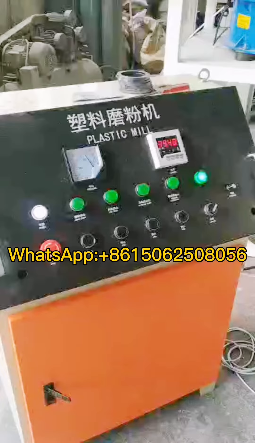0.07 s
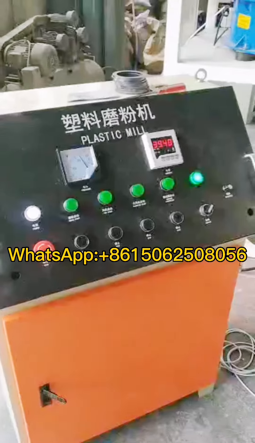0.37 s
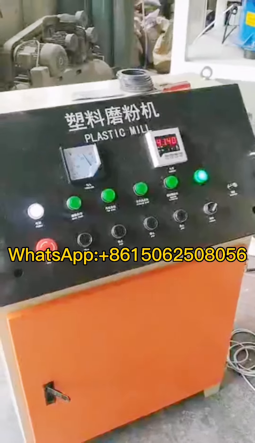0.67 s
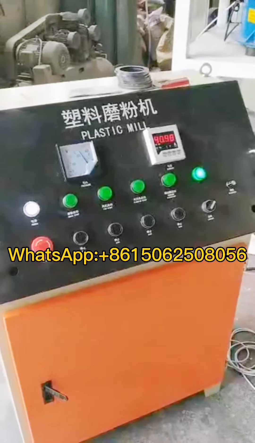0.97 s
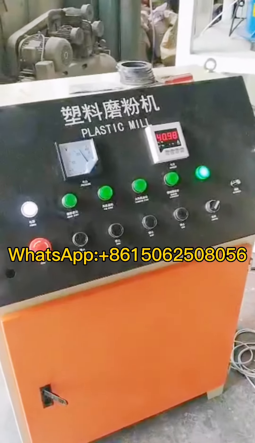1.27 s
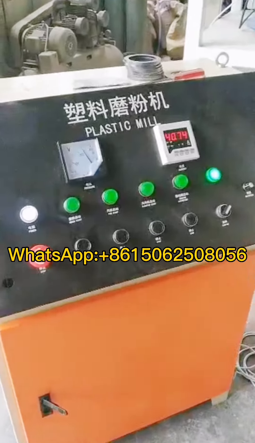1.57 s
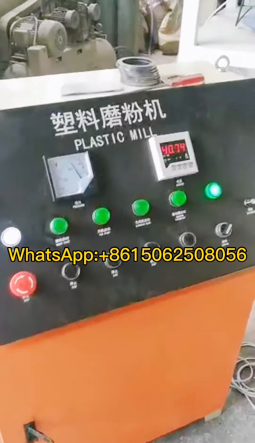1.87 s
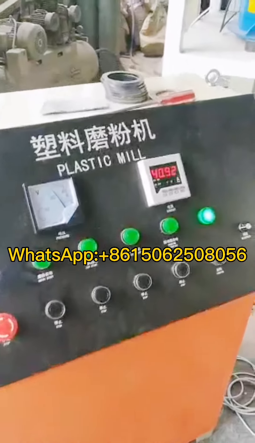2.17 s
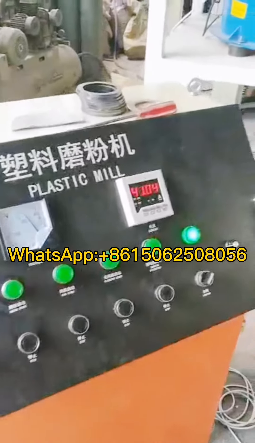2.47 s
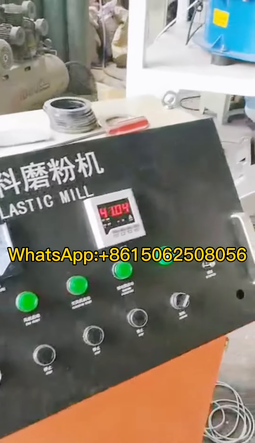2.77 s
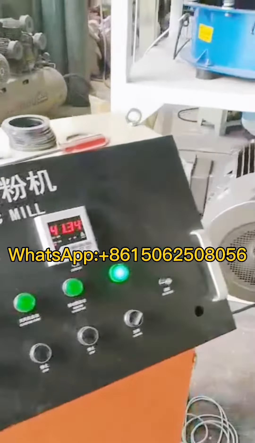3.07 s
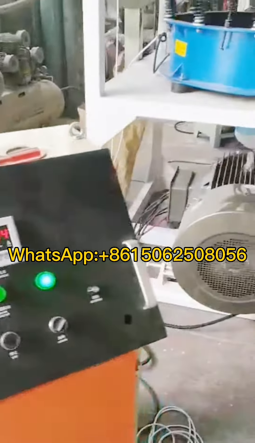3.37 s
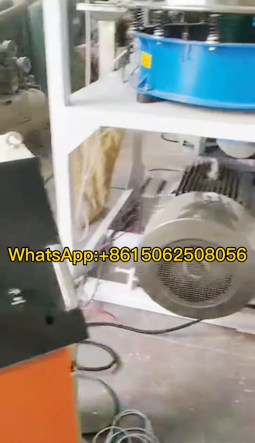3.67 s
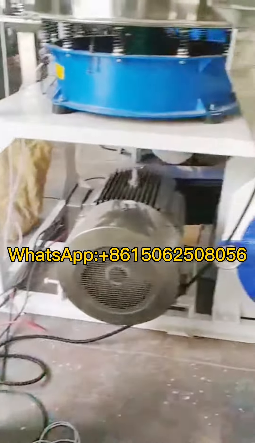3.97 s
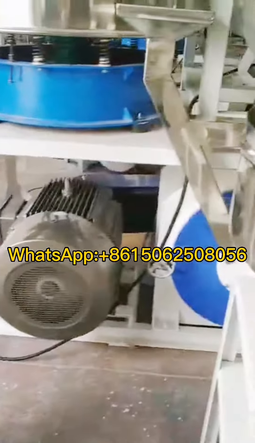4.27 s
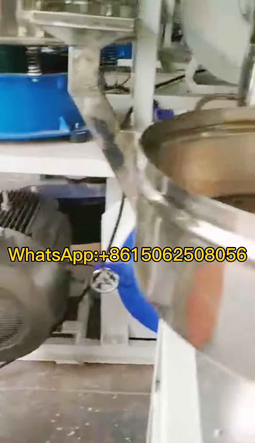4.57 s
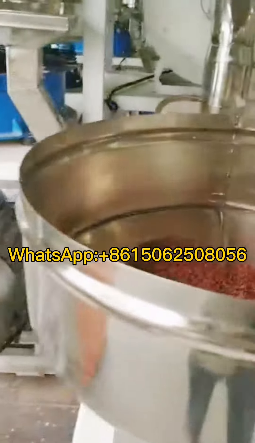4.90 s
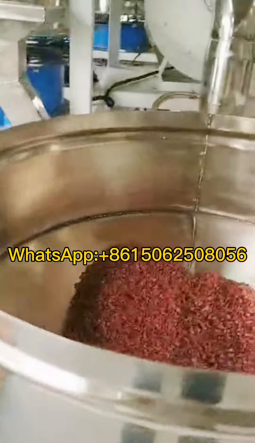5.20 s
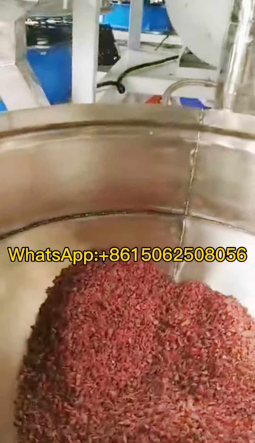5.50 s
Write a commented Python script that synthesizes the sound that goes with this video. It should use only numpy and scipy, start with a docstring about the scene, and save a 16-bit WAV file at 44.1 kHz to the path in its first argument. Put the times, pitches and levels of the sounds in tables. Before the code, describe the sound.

A plastic grinding machine runs close by in a workshop. Granules hiss brightly through steel over a roaring blower, a low throbbing motor drone and a wavering high whine. The hand-held microphone moves from the control panel past a motor's cooling fan to the open hopper, where the roar grows fuller and slightly hollow. Two short handling bumps hit the left side, one near the start and one near the end.

```python
"""A plastic pulverizer running in a workshop, heard close up on a hand-held stereo recorder
carried from its control panel toward the hopper. Granules and powder hiss through the steel mill
and ducts over the roar of the blower, the hum of the motors and the whine of the spinning disc.
A cooling fan passes on the way. Twice a bump of the hand overloads the left microphone."""
import sys
import numpy as np
from scipy import signal
from scipy.fft import rfft, irfft
from scipy.io import wavfile
from scipy.ndimage import uniform_filter1d, map_coordinates

SR = 44100
rng = np.random.default_rng(int(sys.argv[2]) if len(sys.argv) > 2 else 0)


def wrap_up_sound(samples):
    """Save the sound to the file named by the first command line argument, as 16-bit audio."""
    columns = np.atleast_2d(samples).T
    # keep every value between -1 and 1, then stretch to whole-number steps
    tamed = np.clip(columns, -1, 1)
    steps = np.round(tamed * 32767).astype(np.int16)
    wavfile.write(sys.argv[1], SR, steps)


N = 244314
TIME = np.arange(N) / SR
HZ = np.fft.rfftfreq(N, 1 / SR)

# the walk from panel to hopper: (time [s], share of the way [0-1])
WALK_TO_HOPPER = [(2.9, 0), (4.1, 0.27), (5.3, 0.91)]
# base spectrum of granules on steel: (frequency [Hz], density [dB/Hz])
GRANULE_HISS = [(500, -78), (2000, -77), (3200, -73), (4200, -65), (5500, -59.5), (6700, -57),
                (7600, -58.5), (9500, -56.5), (11000, -56.5), (12500, -59), (14300, -80)]
# change in that hiss at the hopper: (frequency [Hz], gain [dB])
HOPPER_HISS_CHANGE = [(2700, -2), (3400, 2), (4600, 2.5), (5600, -0.5), (8300, 3), (9500, 2),
                      (12500, -10.5)]
# passing hollows in the treble: (frequency [Hz], typical depth [dB])
FLICKER_DEPTH = [(1500, 0.5), (2200, 5), (3200, 17.5), (4400, 24.5), (6000, 10.5), (7400, 1), (11000, 2),
                 (13500, 8)]
# base spectrum of the blower's air: (frequency [Hz], density [dB/Hz])
BLOWER_RUSH = [(20, -49.5), (35, -59), (78, -59.5), (140, -54.8), (210, -58.5), (270, -57), (400, -59.7),
               (560, -65.5), (1000, -65), (1600, -65.5), (2600, -65.5), (4000, -72.5), (14000, -60)]
# how much each band follows the roar's gain: (frequency [Hz], weight [ratio])
ROAR_WEIGHT = [(60, 1.2), (200, 0), (330, 1), (620, 0.5), (1000, 0.28), (1600, 0.2), (2600, 0)]
# resonances and hollows of the open hopper: (frequency [Hz], width [Hz], gain [dB])
HOPPER_MODES = [(174, 45, 5.5), (303, 36, 1.5), (407, 65, 3), (462, 18, -1.5), (492, 57, 5), (730, 50, 4.5),
                (945, 65, 5), (1047, 55, 4.5), (1150, 59, 3), (1235, 40, -4)]
# steady peaks and hollows in the rushing noise; the noise thins just above the whine: (frequency [Hz], width
# [Hz], gain [dB])
RUSH_COLOUR = [(220, 18, -2), (262, 25, 1.5), (345, 25, 2), (378, 25, -1.5), (408, 30, 2.5),
               (452, 25, -1.5), (500, 70, 2.7), (585, 25, 2.5), (620, 35, -2.5), (680, 35, 3), (735, 80, 4),
               (840, 70, -2.5), (960, 90, 5), (1040, 60, 2), (1185, 45, -2.5), (1260, 55, 3.5),
               (1394, 60, 4.5), (1550, 60, 2), (1713, 50, 4), (1815, 110, -6.5), (1948, 73, 4.5),
               (2780, 150, 3), (3150, 110, -3.5), (3470, 280, 4.5), (3790, 200, -4), (4300, 300, 1),
               (4570, 100, -2.5), (5030, 330, 2), (5500, 400, -1.3)]
# weaker tones beating against the motor drone: (frequency [Hz], level re the drone [dB])
DRONE_BEATS = [(118.9, -15.5), (126.0, -18)]
# brief dips in the drone: (time [s], length [s], gain [dB])
DRONE_DIPS = [(1.544, 0.12, -4), (1.732, 0.055, -8)]
# shafts, belts and mains: (frequency [Hz], mean level at the panel [dB], change by the hopper [dB])
HUM_TONES = [(24.9, -39.5, -6), (49.7, -45, 1), (61.1, -36.5, 4.5), (179.5, -56, 3), (243, -38, 4.5),
             (250.5, -43, -3.5), (296.5, -44, 3), (404.6, -51.5, 10), (736.8, -52, -7)]
# disc whine along the walk through the room's standing waves:
# (time [s], left relative level [dB], right relative level [dB])
WHINE_LEVELS = [(0.34, -32, -35), (0.44, -35, -44), (0.52, -31.5, -40), (0.62, -36, -43),
                (0.95, -36.5, -47), (1.3, -33, -47), (1.55, -44, -45), (1.78, -45, -31), (2.0, -42, -28.3),
                (2.15, -45, -30), (2.45, -41, -27), (2.79, -35, -34), (2.94, -32.5, -28.5),
                (3.27, -33.5, -28), (3.44, -38, -38), (3.62, -43, -30), (3.82, -44, -44),
                (3.99, -34.5, -35), (4.15, -34, -42), (4.32, -34, -33), (4.45, -33.5, -26),
                (4.66, -38, -42), (4.88, -32, -26.5), (5.0, -37, -28.5), (5.12, -33.5, -28.5),
                (5.3, -33, -30), (5.42, -42, -43)]
# lag of the whine at the right microphone behind the left: (time [s], phase [rad])
WHINE_RIGHT_LAG = [(0.55, 0.6), (0.8, 2.0), (1.5, 2.1), (1.62, 4.8), (2.15, 4.6), (2.7, 3.7), (2.93, 2.0),
                   (3.1, 1.9), (3.35, 0.5), (3.62, 0), (3.73, -1.9), (4.05, -3.2), (4.28, -4.6),
                   (4.45, -2.9), (4.65, -1.8), (4.92, -2.8), (5.03, -4.4), (5.3, -4.2), (5.45, -3.6)]
# overtones of the whine: (multiple [ratio], left level [dB], right level [dB])
WHINE_OVERTONES = [(2, -49.5, -46.5), (3, -46, -46), (4, -41.5, -41), (5, -37.5, -32.5)]
# base spectrum of the cooling fan: (frequency [Hz], density [dB/Hz])
FAN_RUSH = [(100, -98), (290, -66.5), (500, -83), (1900, -66), (3400, -69), (5000, -67.5), (9000, -90)]
# its blade tones at the closest point: (frequency [Hz], level [dB])
FAN_BLADE_TONES = [(294.8, -39.5), (589.6, -48.5)]
# hand bumps on the left microphone: (time [s], push before overload [dB], decay time [s])
HAND_BUMPS = [(0.5516, 9, 0.0105), (4.8116, 12.5, 0.016)]
# ring of the recorder's case: (frequency [Hz], level [dB], time to fall 60 dB [s])
CASE_RING = [(694, -24, 0.018), (1150, -35, 0.0092)]
# microphone port resonances, left row then right: (frequency [Hz], width [Hz], gain [dB])
MIC_PORTS = [(9300, 2760, 9), (8485, 1870, 11.5)]
# likeness of the two microphones: (frequency [Hz], coherence [0-1])
MIC_COHERENCE = [(60, 0.99), (160, 0.92), (260, 0.94), (430, 0.3), (710, 0.52), (1170, 0), (1900, 0.2),
                 (14000, 0)]
# stereo balance: (frequency [Hz], left minus right [dB])
MIC_BALANCE = [(60, -4.5), (140, -3), (320, -0.5), (500, -1), (740, -9), (980, 0.5), (1300, -2), (2700, 0),
               (3900, -3.5), (5500, 0), (7500, -1.5), (11000, 1.5), (14000, 1.5)]
# the recorder fades in: (time [s], gain [dB])
FADE_IN = [(0.0, -83), (0.102, -66), (0.104, -9.5), (0.14, -9.5), (0.2, -6.5), (0.25, -3.5), (0.29, -1.5)]


def granules(ticks_per_s=11000, tick_share=0.25, size_db=2.5, gain_db=-0.76, mill_at_s=2.8, mill_db=2):
    """Countless granules tick on ringing steel in a hiss of powder, strongest beside the mill."""
    sizes = amp(size_db * np.minimum(rng.exponential(1, (2, N)), 4)) * rng.choice([-1, 1], (2, N))
    ticks = unit_rms(sizes * (rng.random((2, N)) < ticks_per_s / SR))
    powder = rng.standard_normal((2, N))
    spray = np.sqrt(tick_share) * ticks + np.sqrt(1 - tick_share) * powder
    feed_db = 0.45 * wander(9.3) + 0.1 * wander(130)  # slightly uneven feed
    swirl_db = 0.95 * np.array([wander(35), wander(29)])
    spray *= amp(gain_db + mill_db * walk_past(mill_at_s, half_width_s=1.9) + feed_db + swirl_db)
    at_panel = rush_at_mics(spray, spectrum(GRANULE_HISS))
    at_hopper = rush_at_mics(spray, spectrum(GRANULE_HISS) + spectrum(HOPPER_HISS_CHANGE))
    return along_walk(at_panel, at_hopper)


def blower(gain_db=0.42, panel_roar_db=-2, hopper_roar_db=4):
    """Turbulent air roars; bass and mids swell and the open hopper rings as the recorder nears it."""
    air = rng.standard_normal((2, N))
    air *= amp(gain_db + 0.62 * wander(13) + 0.84 * wander(38))  # gusts and flutter
    rush_db, weight = spectrum(BLOWER_RUSH), spectrum(ROAR_WEIGHT)
    at_panel = rush_at_mics(air, rush_db + panel_roar_db * weight)
    at_hopper = rush_at_mics(air, rush_db + hopper_roar_db * weight + bell_curves(HOPPER_MODES))
    return along_walk(at_panel, at_hopper)


def motors(drone_hz=122.5, throb_db=0.86, waver_db=1.14):
    """The main drone beats against nearby tones and recedes on the walk; shafts, belts and mains hum."""
    drone = amp(throb_db * wander(5.8)) * tone(drone_hz, drift_rad=1, rate_hz=1.17)
    drone += sum(amp(db) * tone(hz, drift_rad=0.49, rate_hz=3.7) for hz, db in DRONE_BEATS)
    dips_db = sum(db * np.exp(-(2 * (TIME - s) / length) ** 2) for s, length, db in DRONE_DIPS)
    drone_db = np.array([along_walk(-27.85, -36.85), along_walk(-24.95, -29.15)])  # left, right
    hum = np.zeros(N)
    for hz, panel_db, change_db in HUM_TONES:
        level_db = along_walk(panel_db, panel_db + change_db) + waver_db * wander(3)
        hum += amp(level_db) * tone(hz, drift_rad=0.49, rate_hz=2.7)
    return drone * amp(drone_db + dips_db) + hum * amp([[-0.6], [0.6]])


def disc(whine_hz=1703.5, gain_db=1.4, shimmer_db=1.35, fading_db=3):
    """The toothed disc whines, out of step at the two microphones; each overtone wavers by itself."""
    lag = np.array([[0], [1]]) * follow(WHINE_RIGHT_LAG)
    level_db = follow(WHINE_LEVELS) + gain_db + shimmer_db * wander(24)
    whine = amp(level_db) * tone(whine_hz, drift_rad=0.55, rate_hz=0.9, lag_rad=lag)
    for multiple, *mics_db in WHINE_OVERTONES:
        for mic, db in enumerate(mics_db):
            level = amp(db + fading_db * wander(3.5))
            whine[mic] += level * tone(multiple * whine_hz, drift_rad=1.5, rate_hz=2.6)
    return whine


def cooling_fan(closest_s=4.26, waver_db=2):
    """The motor's fan rushes and its blades hum as the recorder passes; the hum carries less far."""
    nearness = walk_past(closest_s, half_width_s=1)
    blades = sum(amp(db + waver_db * wander(5)) * tone(hz, drift_rad=0.5, rate_hz=2.8)
                 for hz, db in FAN_BLADE_TONES)
    rush = rush_at_mics(rng.standard_normal((2, N)) * nearness, spectrum(FAN_RUSH))
    return rush + blades * nearness ** 2


def hand_bumps(rise_s=0.00046, recover_s=0.06):
    """Pressure drives the left diaphragm to its stop, leaks away and swings back; the case knocks."""
    push, knock = np.zeros((2, N))
    for start_s, push_db, decay_s in HAND_BUMPS:
        age = np.maximum(TIME - start_s, 0)
        onset = 1 - np.exp(-age / rise_s)
        backswing = decay_s / recover_s * np.exp(-age / recover_s)
        push += amp(push_db) * onset * (np.exp(-age / decay_s) - backswing)
        for hz, db, t60 in CASE_RING:
            knock += amp(db - 60 * age / t60) * np.sin(2 * np.pi * hz * age)
    return np.array([np.tanh(push) + knock, knock])


def rush_at_mics(noise, density_db):
    """Two white noises take on a spectrum, peaks and hollows, port resonances and the room's image."""
    left, other = rfft(noise)
    coherence = spectrum(MIC_COHERENCE)
    right = coherence * left + np.sqrt(1 - coherence ** 2) * other
    ports_db = np.array([bell_curves([port]) for port in MIC_PORTS])
    balance_db = np.array([[0.5], [-0.5]]) * spectrum(MIC_BALANCE)
    gain = amp(density_db + bell_curves(RUSH_COLOUR) + ports_db + balance_db)
    return irfft(np.array([left, right]) * gain, N) * np.sqrt(SR / 2)


def treble_flicker(sound, changes_per_s=14, width_hz=100, frame=1024):
    """The treble flickers: narrow hollows come and go at random while the broad colour stays steady."""
    framing = dict(nperseg=frame, noverlap=frame * 3 // 4)
    hz, times, bands = signal.stft(sound, SR, **framing)
    grid = np.meshgrid(hz / width_hz, times * changes_per_s, indexing="ij")
    ripple = unit_rms(map_coordinates(rng.standard_normal((frame, frame)), grid, mode="wrap"))
    depth_db = np.interp(hz, HZ, spectrum(FLICKER_DEPTH))[:, None]
    gain = amp(depth_db * np.minimum(ripple, 0.4))  # deep hollows, low peaks
    gain /= np.sqrt(uniform_filter1d(gain ** 2, size=13, axis=0))
    return signal.istft(bands * gain, **framing)[1][:, :N]


def along_walk(at_panel, at_hopper):
    """Blends from the panel position toward the hopper as the recorder moves."""
    share = follow(WALK_TO_HOPPER)[0]
    return (1 - share) * at_panel + share * at_hopper


def walk_past(closest_s, half_width_s):
    """Nearness to a spot on the walk, one at the closest point."""
    return 1 / (1 + ((TIME - closest_s) / half_width_s) ** 2)


def tone(hz, drift_rad, rate_hz, lag_rad=0):
    """A sine of unit rms whose phase drifts at random."""
    return np.sqrt(2) * np.sin(2 * np.pi * hz * TIME + drift_rad * wander(rate_hz) - lag_rad)


def wander(rate_hz):
    """Random motion of unit rms, mostly slower than rate_hz."""
    return unit_rms(irfft(rfft(rng.standard_normal(N)) * (HZ > 0) / (1 + (HZ / rate_hz) ** 4), N))


def bell_curves(rows):
    """Peaks and hollows summed in dB."""
    return sum(db / (1 + (2 * (HZ - hz) / width) ** 2) for hz, width, db in rows)


def spectrum(points):
    """A table interpolated over log frequency."""
    hz, value = np.transpose(points)
    return np.interp(np.log(HZ + 1), np.log(hz + 1), value)


def follow(rows):
    """Each column of a time table at every sample."""
    times, *columns = np.transpose(rows)
    return np.array([np.interp(TIME, times, column) for column in columns])


def amp(db):
    """Decibels to gain."""
    return 10 ** (np.asarray(db) / 20)


def unit_rms(x):
    """Scales to an rms of one."""
    return x / np.sqrt(np.mean(x ** 2) + 1e-20)


def scene():
    """The whole machine at close range, and the hand on the recorder."""
    return treble_flicker(granules() + blower() + cooling_fan()) + motors() + disc() + hand_bumps()


def record(dry):
    """The recorder fades in with the deep bass last, clips at full scale and cuts the top treble."""
    bass_hz, bass_in_s, early_bass_db, top_hz = 93.5, 0.39, -12, 14330
    bass = irfft(rfft(dry) / (1 + (HZ / bass_hz) ** 8), N)
    held_back = (1 - amp(early_bass_db)) * np.clip((bass_in_s - TIME) / 0.02, 0, 1)
    clipped = np.clip((dry - held_back * bass) * amp(follow(FADE_IN)), -1, 1)
    lowpass = signal.firwin(1023, top_hz, window=("kaiser", 8), fs=SR)
    return signal.oaconvolve(clipped, lowpass[None], "same")


dry = scene()
out = record(dry)
wrap_up_sound(out)
```